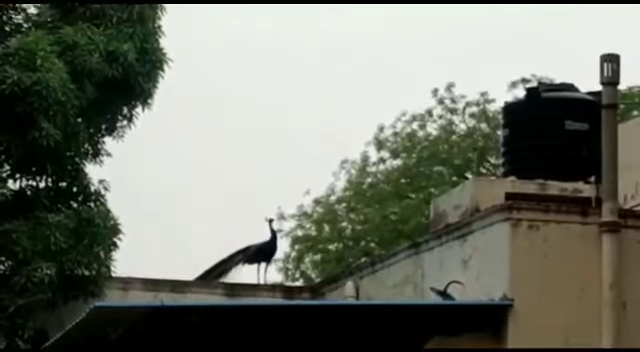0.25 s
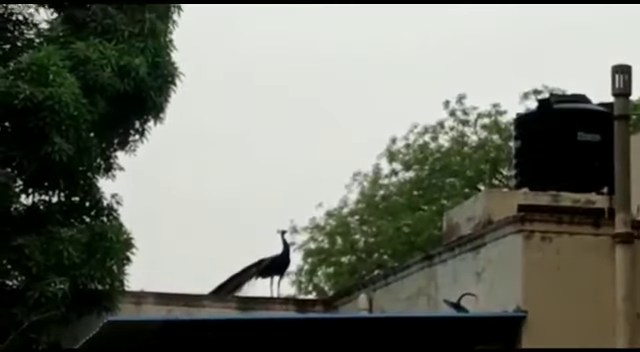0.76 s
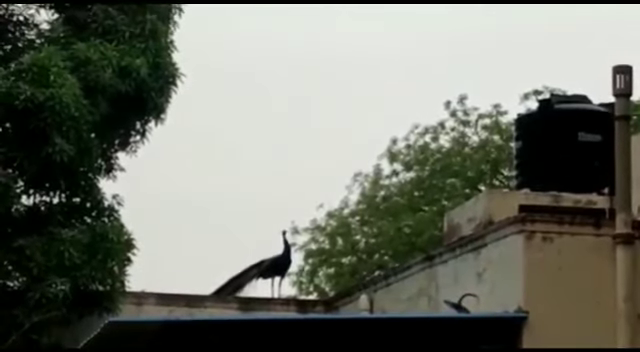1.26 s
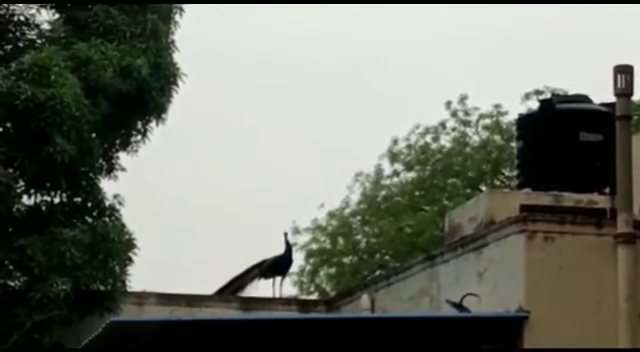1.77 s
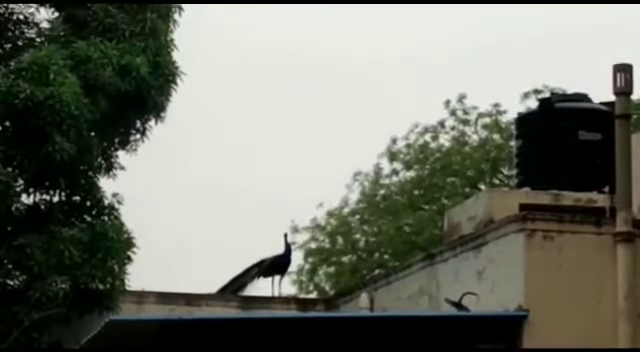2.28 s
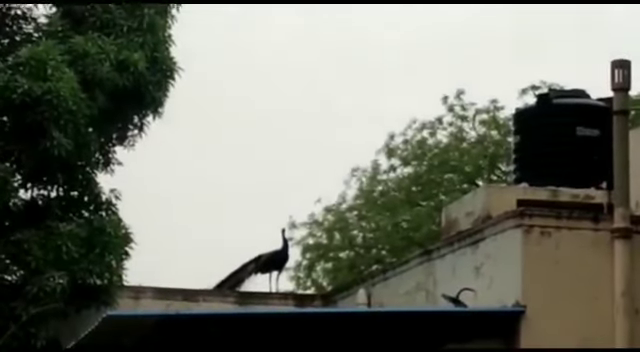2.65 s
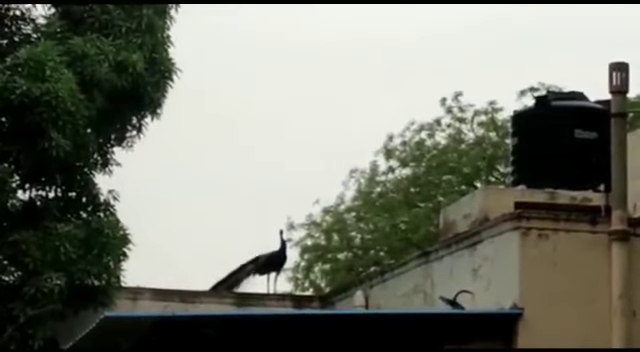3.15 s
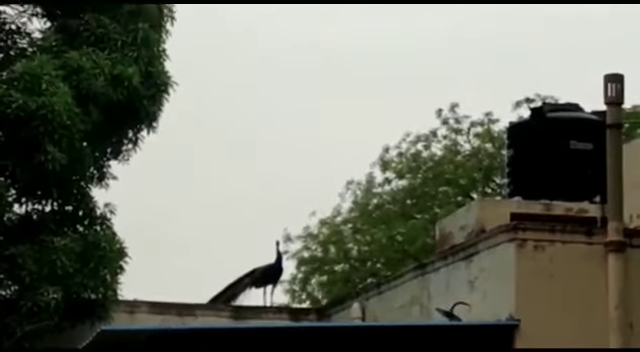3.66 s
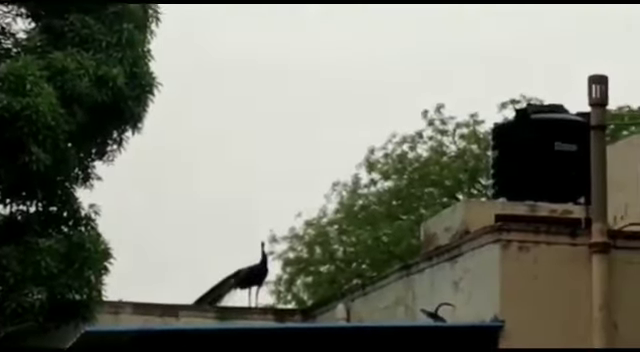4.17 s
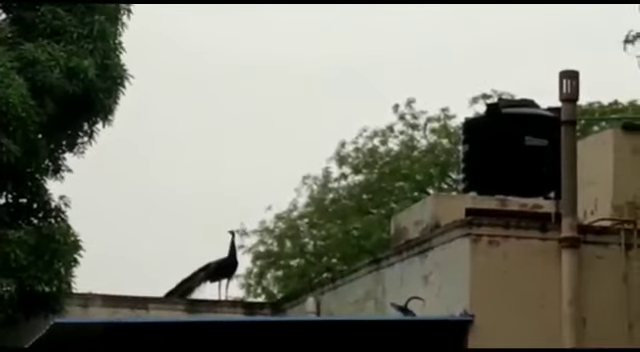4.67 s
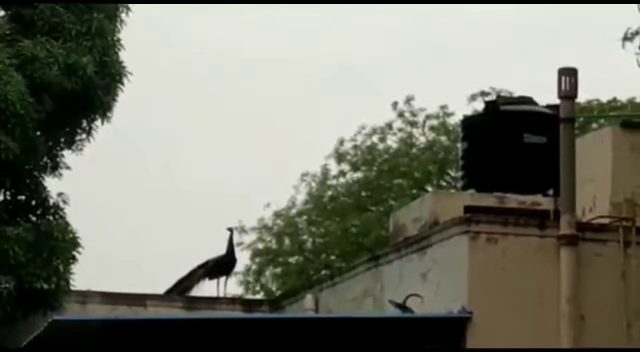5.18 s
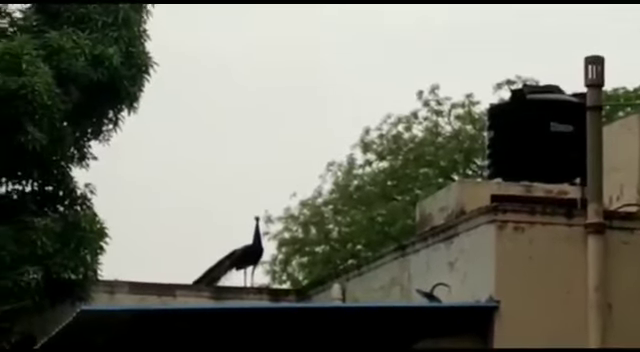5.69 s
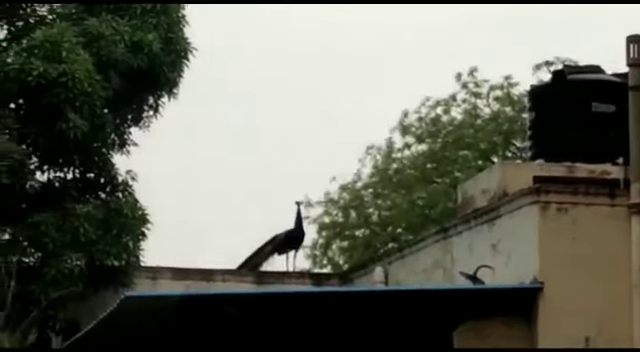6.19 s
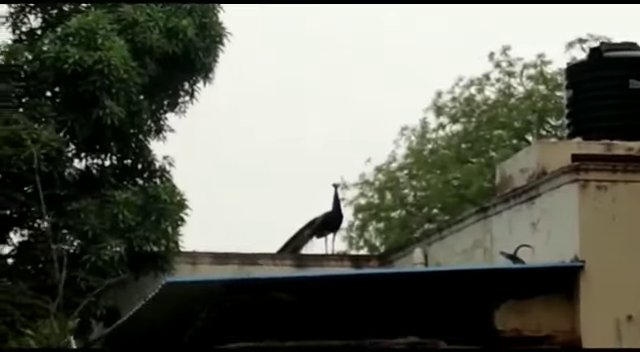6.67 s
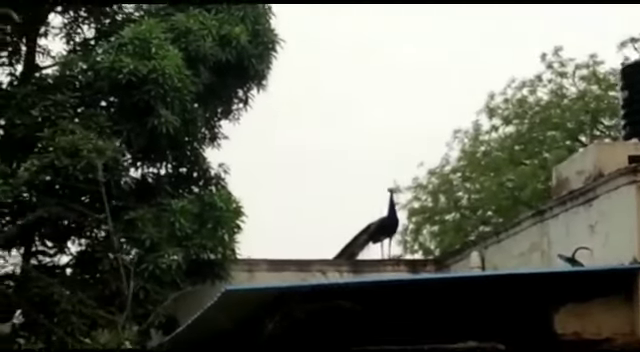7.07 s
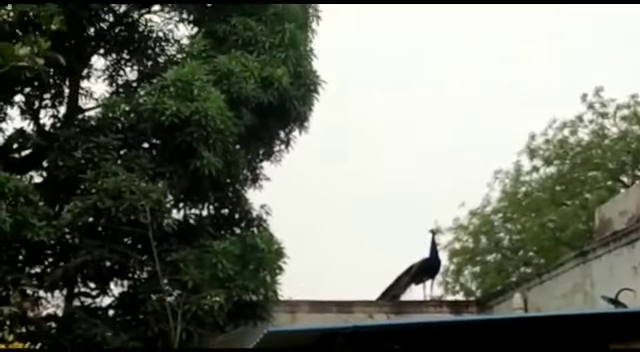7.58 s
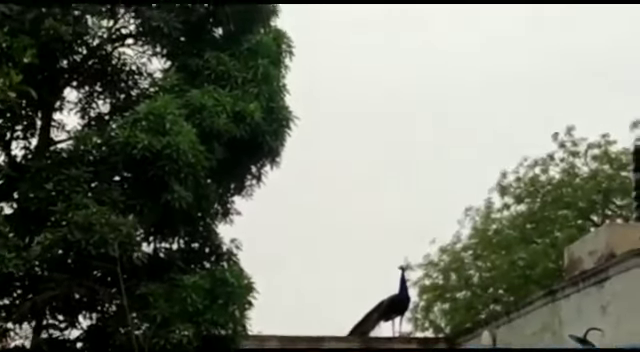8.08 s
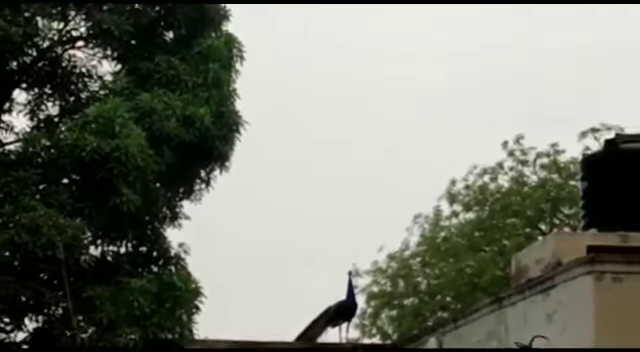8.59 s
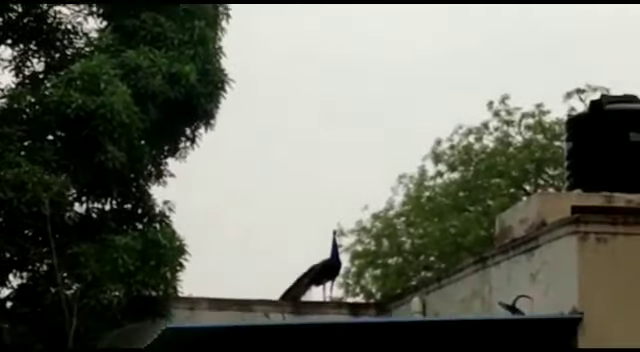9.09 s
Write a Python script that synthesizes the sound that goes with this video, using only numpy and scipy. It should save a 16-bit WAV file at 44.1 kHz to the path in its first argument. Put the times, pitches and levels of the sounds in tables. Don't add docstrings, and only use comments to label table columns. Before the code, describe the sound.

Outdoors, echoing peacock screams and harsh parakeet squawks fill the first three seconds, then fade into sparse songbird whistles, coos and faint hum.

```python
import sys
import numpy as np
from scipy import signal
from scipy.fft import rfft, irfft
from scipy.io import wavfile
from scipy.ndimage import uniform_filter1d, minimum_filter1d, map_coordinates

SR = 44100
rng = np.random.default_rng(int(sys.argv[2]) if len(sys.argv) > 2 else 0)


def attenuation_scalar(level_db):
    decades = np.asarray(level_db, float) / 20
    return 10 ** decades


def bounce(signal):
    frames = np.transpose(np.atleast_2d(signal))
    limited = np.clip(frames, -1, 1)
    pcm = np.round(limited * 32767).astype(np.int16)
    wavfile.write(sys.argv[1], SR, pcm)


N = 411894

# time in seconds, level in dB.
FLOCK_LEVEL = [(0.0, -28), (.31, -30), (.7, -36.5), (.8, -36), (.85, -30), (.96, -23.5), (1.02, -44),
               (1.14, -44), (1.2, -29), (1.48, -43), (1.71, -35), (2.109, -33), (2.341, -33), (2.52, -42),
               (2.66, -31), (2.78, -28.5), (3.01, -50.5), (3.22, -47), (3.742, -47.5), (4.8, -47.5),
               (5.2, -53.5), (6.3, -45.5), (9.34, -61.5)]


def at_hz(points, hz):
    points_hz, values = np.transpose(points)
    return np.interp(np.log(hz), np.log(points_hz), values)


def drift(rate_hz, size=N):
    points = rng.standard_normal(int(size / SR * 400) + 2)
    return 1.22 * np.interp(np.arange(size) * rate_hz / SR, np.arange(len(points)), points)


def filtered(x, order, cut_hz, kind="low"):
    return signal.sosfilt(signal.butter(order, cut_hz, kind, fs=SR, output="sos"), x)


def resonances_db(rows, hz):
    return sum(db / (1 + (2 * (hz - centre_hz) / width_hz) ** 2) for centre_hz, width_hz, db in rows)


def add(out, start_s, sound, pan_db):
    i = int(start_s * SR)
    soft_ends = signal.windows.tukey(len(sound), min(1, 200 / len(sound)))
    sound = (sound * soft_ends)[:N - i]
    out[:, i:i + len(sound)] += sound * attenuation_scalar([[pan_db / 2], [-pan_db / 2]])


def coloured(spectrum, patchy_db):
    # frequency in Hz, left-right likeness 0-1.
    likeness = [(60, 0.46), (180, 0.78), (550, 0.36), (1650, 0.0075), (4970, 0.12), (15000, 1)]
    hz = np.fft.rfftfreq(N, 1 / SR) + 1
    mid, side = rfft(rng.standard_normal((2, N)))
    alike = np.clip(at_hz(likeness, hz), 0, 1)
    pair = np.sqrt(1 + alike) * mid + np.sqrt(1 - alike) * side * [[1], [-1]]
    noise = irfft(pair * attenuation_scalar(at_hz(spectrum, hz)), N)
    _, _, cells = signal.stft(noise, nperseg=512)
    band = (10 * np.log2(np.arange(len(cells[0])) + 1)).astype(int)
    flicker = uniform_filter1d(rng.standard_normal((band.max() + 1, cells.shape[2])), size=6) * 2.4
    flicker = .88 * flicker + .48 * uniform_filter1d(flicker, size=9, axis=0) * 3
    dropout_db = 28 * np.clip(-1.5 - flicker[band], 0, 1)
    cells = cells * attenuation_scalar(patchy_db * flicker[band] - dropout_db)
    noise = signal.istft(cells, nperseg=512)[1][:, :N]
    return noise / np.sqrt(np.mean(noise ** 2))


def background(smear):
    # frequency in Hz, level in dB per Hz.
    town_spectrum = [(18, -79), (30, -45), (124, -20.5), (198, -4), (301, -10), (551, -8), (931, -11.5),
                     (1790, -10), (2460, 2), (3110, -12.5), (3830, -7), (5800, -14.5), (6480, -14.5),
                     (11200, -24.5), (15800, -25)]
    high_spectrum = [(1200, -87), (2600, -12.5), (3200, 3), (4500, 1.5), (6500, -3.5), (8800, -8.5),
                     (10000, -15), (15500, -32)]
    low_spectrum = [(250, -56), (500, -18), (700, -9.5), (1000, -22.5), (1500, -3.5), (2000, -0.5),
                    (2500, 1), (3000, -7.5), (3600, -27), (6000, -64)]
    # time in seconds, level in dB.
    chatter_level = [(0.0, -27), (.3, -35), (.75, -30.5), (1.9, -32.5), (3.0, -38), (3.9, -53.5),
                     (4.45, -43), (4.9, -51), (5.85, -43), (7.9, -45), (9.34, -49.5)]
    # centre in Hz, width in Hz, gain in dB.
    ports = [(2555, 126, 4), (3800, 49, 8), (5135, 310, 7.5), (6434, 91, 12), (7460, 1100, 3)]
    # frequency in Hz, left-right difference in dB.
    lean = [(60, 0), (130, 0), (290, 0.5), (640, 1), (1410, -1), (3100, -7.5), (6820, -7.5), (15000, 11)]
    t = np.arange(N) / SR
    low = attenuation_scalar(np.interp(t, *np.transpose(chatter_level)))
    high = attenuation_scalar(np.interp(t, *np.transpose(FLOCK_LEVEL)))
    wash = (low + smear) * coloured(low_spectrum, patchy_db=3.8)
    wash += high * coloured(high_spectrum, patchy_db=4.0)
    wash += attenuation_scalar(-47) * coloured(town_spectrum, patchy_db=3.0)
    hz = np.fft.rfftfreq(N, 1 / SR)
    pan_db = at_hz(lean, hz + 1) * [[.5], [-.5]]
    return irfft(rfft(wash) * attenuation_scalar(resonances_db(ports, hz) - 5.0 + pan_db), N)


def hum():
    pitch_hz = 206.4 + 6.37 * drift(25)
    level_db = -69 + 2.55 * drift(18)
    return np.sqrt(2) * attenuation_scalar(level_db) * np.sin(2 * np.pi * np.cumsum(pitch_hz) / SR)


def wind():
    # centre in seconds, level in dB.
    gusts = [
        (.85, -59.5),
        (2.25, -62.5),
        (6.88, -66.5),
    ]
    half_length_s = 0.35
    t = np.arange(N) / SR
    swell = sum(attenuation_scalar(db) * np.exp(-((t - s) / half_length_s) ** 2) for s, db in gusts)
    swell = swell * attenuation_scalar(3.5 * drift(18))
    puff = filtered(rng.standard_normal((2, N)) + rng.standard_normal(N), 2, [190, 430], "band")
    return swell * puff / puff.std()


def insect():
    # start in seconds, level in dB, T60 in seconds.
    sizzles = [
        (7.601, -50.5, 0.53),
        (7.7, -48, 0.38),
    ]
    out, t = np.zeros((2, N)), np.arange(SR // 2) / SR
    for start_s, db, t60_s in sizzles:
        buzz = filtered(rng.standard_normal(len(t)), 2, [9300, 10600], "band")
        add(out, start_s, 3.0 * attenuation_scalar(db - 60 * t / t60_s) * buzz, pan_db=-3.0)
    return out


def whistle(table, bow, waver_db, wobble, pan_db, order=4):
    out = np.zeros((2, N))
    for start_s, length_s, first_hz, last_hz, db in table:
        u = np.linspace(-1, 1, int(length_s * SR))
        pitch_hz = (first_hz + last_hz) / 2 * (1 + bow * (1 - u ** 2)) + (last_hz - first_hz) / 2 * u
        pitch_hz *= 1 + wobble * drift(83.4, len(u))
        swell = attenuation_scalar(db + 2 + waver_db * drift(130, len(u))) * (1 - u ** order)
        add(out, start_s, swell * np.sin(2 * np.pi * np.cumsum(pitch_hz) / SR), pan_db)
    return out


def doves():
    # delay or start in seconds, length in seconds, first Hz, last Hz, level in dB.
    phrase = [
        (0.0, 0.086, 508, 502.5, -58),
        (0.086, 0.186, 648, 586, -66),
        (0.347, 0.096, 488.5, 519.5, -62),
        (.42, .33, 625, 500, -62.5),
        (1.067, .26, 614, 450, -62),
    ]
    far_notes = [
        (.001, 0.11, 707, 628, -47),
        (4.99, 0.15, 540, 543, -63),
        (5.28, 0.46, 543.6, 538, -57.5),
        (5.9, 0.21, 541, 520, -60.5),
        (8.12, 0.27, 753, 775, -61),
        (8.45, 0.24, 520, 503, -70),
    ]
    starts_s = [3.2, 4.91, 6.6, 8.32]
    coos = [(s + delay_s, *rest) for s in starts_s for delay_s, *rest in phrase if s + delay_s < N / SR]
    return whistle(coos + far_notes, bow=0.0572, waver_db=3.0, wobble=0.0033, pan_db=-1.0)


def songbirds():
    # start in seconds, length in seconds, first Hz, last Hz, level
    # in dB.
    straight = [(.001, 0.078, 2160, 1915, -40), (.075, 0.068, 3340, 2920, -32.5),
                (4.42, 0.061, 3800, 3600, -45.5), (4.75, 0.11, 4530, 3700, -43), (4.84, 0.02, 3850, 2970, -54),
                (6.0, 0.13, 4720, 3620, -44), (6.105, 0.022, 3770, 2790, -47), (6.37, 0.018, 3620, 2860, -43),
                (6.25, 0.067, 4680, 3590, -48), (6.795, 0.022, 4300, 2890, -44),
                (7.27, .04, 4780, 4010, -45.5), (7.92, 0.033, 4000, 3700, -50.5),
                (7.96, 0.031, 3390, 3160, -43.5), (8.38, 0.085, 4675, 3570, -46),
                (9.115, 0.087, 5280, 3740, -45),
                (0.721, 0.26, 2380, 2324, -34), (3.03, 0.067, 2822, 3130, -47),
              (3.27, 0.15, 6080, 6350, -47.5), (4.48, 0.083, 4225, 4230, -44),
              (5.099, 0.2, 1373, 1343, -55.5), (5.55, 0.052, 3800, 3970, -53),
              (5.709, 0.087, 3910, 4050, -48.5), (7.639, 0.09, 2393, 2484, -43),
              (8.02, 0.031, 3050, 3220, -46.5), (8.131, 0.22, 1600, 1594, -57.5),
              (8.74, 0.12, 1810, 1967, -53), (8.929, 0.28, 4130, 4130, -56),
                (3.851, .121, 4210, 4790, -54), (5.761, .041, 2740, 2010, -54), (6.221, .11, 2450, 1760, -55),
             (6.621, .031, 2710, 3290, -55), (6.821, .131, 2610, 2410, -52), (6.961, .051, 3755, 3785, -54),
             (7.121, .081, 2755, 2785, -54), (7.251, .061, 2490, 1960, -54), (7.301, .061, 3890, 2810, -61),
             (7.501, .081, 2290, 2110, -55), (7.841, .041, 2485, 2475, -51), (7.921, .051, 2455, 2545, -51),
             (7.771, .061, 2155, 2245, -53), (8.161, .051, 2505, 2485, -53), (8.031, .031, 4290, 4010, -56),
             (.361, .051, 4190, 3810, -43), (3.481, .061, 5620, 5210, -44), (3.551, .036, 5210, 4410, -46),
             (3.491, .071, 6900, 6100, -49), (.441, .031, 3390, 3110, -39), (.481, .028, 4290, 3010, -37),
             (.641, .051, 3890, 2910, -43), (.601, .041, 2945, 2755, -41)]
    humps = [(3.665, 0.094, 6380, 6740, -48), (5.27, 0.13, 1360, 1502, -46.5),
             (6.32, 0.054, 3555, 3550, -39.5), (6.4, 0.056, 2457, 2590, -43.5),
             (6.75, 0.1, 4220, 4310, -48), (7.07, 0.034, 2394, 2600, -47), (7.6, 0.074, 3880, 3430, -53),
             (8.48, 0.19, 4050, 3910, -54.5), (9.28, 0.063, 3890, 3650, -52.5)]
    scoops = [(.33, 0.062, 3066, 2795, -34), (3.89, 0.13, 6290, 4210, -46.5),
              (3.96, 0.045, 5000, 4620, -45.5), (4.0, 0.033, 4300, 4200, -45),
              (4.58, 0.11, 4600, 3450, -52), (5.41, 0.11, 1506, 1022, -49.5),
              (8.83, .12, 3950, 3535, -49.5), (8.89, 0.16, 3910, 5440, -54.5), (9.19, 0.1, 2930, 3930, -44)]
    chips = [
        (7.111, .015, 2640, 2760, -41),
        (7.413, .046, 2610, 2670, -44),
        (8.475, .038, 4100, 3020, -42),
        (8.864, .017, 3710, 3630, -47),
        (7.684, .031, 2485, 2505, -47),
    ]
    kinds = [(straight, 0), (humps, .04), (scoops, -0.031)]
    whistles = sum(whistle(table, bow, waver_db=3.2, wobble=0.015, pan_db=-6.0) for table, bow in kinds)
    return whistles + whistle(chips, 0, waver_db=2.5, wobble=.008, pan_db=-6.5, order=30)


def voice(pitch_hz, partial_db, hoarse, memory, waver_db):
    turn = 2 * np.pi * np.cumsum(pitch_hz) / SR
    out = np.zeros(len(turn))
    for k, db in enumerate(partial_db, 1):
        waver = waver_db * min(k, 6) ** .5 * drift(28, len(turn))
        gain = attenuation_scalar(db + waver) * (k * pitch_hz < .37 * SR)
        white = rng.standard_normal((2, len(turn)))
        rasp = signal.lfilter([2 * (1 - memory) ** 1.5], [1, -2 * memory, memory ** 2], white)
        phase = k * turn + 2 * np.pi * rng.random()
        spread = rasp[0] * np.sin(phase) + rasp[1] * np.cos(phase)
        out += gain * (np.sin(phase) + hoarse * min(k * k / 9, 4) * spread)
    return np.sqrt(2) * out


def parakeets():
    # time in seconds, pitch in Hz, level in dB.
    plain_shape = [(0, 1100, -14), (.014, 1800, -4), (.028, 2235, 0.1), (.045, 2200, 0), (.07, 1750, -2),
                   (.1, 1520, -2), (.122, 1380, -4), (.135, 1130, -14)]
    held_shape = [(0, 1490, -16), (.02, 1910, -9.5), (.04, 2300, -1), (.06, 2198, -3.5), (.075, 2185, -7),
                  (.095, 1993, 0), (.11, 1823, -7), (.125, 1490, -19), (.14, 1280, -14)]
    # start in seconds, level in dB, pitch factor, stretch, rasp 0-1.2.
    squawks = [
        (0.581, -42, 1.38, 1.27, 0.6),
        (1.181, -36, 1.04, 0.85, 0.97),
        (1.45, -34.5, 1.024, 0.91, 0.27),
        (1.728, -37, 0.99, 0.85, 0.4),
        (1.998, -39.5, 0.94, 0.97, 0.4),
        (2.419, -42.5, 0.96, 1.18, 0.2),
        (3.139, -42.5, 1.004, 0.95, 0.43),
        (3.422, -42, 0.96, 0.94, 0.52),
        (4.054, -47.5, 1.08, 0.91, 0.4),
        (7.235, -56, 0.96, 1.2, 0.8),
    ]
    held_squawks = [
        (.13, -31.5, 0.98, 1.01, 0.89),
        (.415, -31.5, 1.0, .87, 1.0),
    ]
    # frequency in Hz, gain in dB.
    beak = [(1000, -4), (2200, 5), (4300, 2.5), (6500, -7.5), (8800, -7), (10000, -28), (15500, -35)]
    out = np.zeros((2, N))
    flock_s, flock_db = np.transpose(FLOCK_LEVEL)
    flock = [(9 * a, np.interp(9 * a + .07, flock_s, flock_db) - 14.0, .85 + .5 * b, .6 + .6 * c, 1.1)
             for a, b, c in rng.random((45, 3))]
    calls = [(plain_shape, row) for row in squawks + flock] + [(held_shape, row) for row in held_squawks]
    for shape, (start_s, level_db, factor, stretch, rasp) in calls:
        s, hz, db = np.transpose(shape)
        t = np.arange(0, s[-1] * stretch, 1 / SR) / stretch
        pitch_hz = uniform_filter1d(factor * np.interp(t, s, hz), size=400)
        pitch_hz = pitch_hz * (1 + .012 * drift(150, len(t)))
        dull_db = .55 * min(level_db + 36, 0)
        partials_db = [at_hz(beak, k * pitch_hz) + dull_db * np.log2(k) + 2.5 * drift(160, len(t))
                       for k in range(1, 10)]
        harsh = voice(pitch_hz, partials_db, hoarse=.8 * rasp, memory=.86, waver_db=1.5)
        add(out, start_s, attenuation_scalar(level_db - 3.0 + np.interp(t, s, db)) * harsh, pan_db=-8.0)
    return filtered(out, 4, 1250, "high")


def peafowl():
    # time in seconds, pitch in Hz, effort in dB, beak opening in dB, hoarseness in dB.
    far_scream = [(.25, 669, -57, -26, -23), (0.349, 706, -43, -18, -6), (0.441, 749, -37, 3, -10.5),
                  (0.519, 745, -36, -2.5, -29), (0.601, 712, -41, -17, -20), (0.699, 671, -46, -10, -4.5)]
    high_scream = [(.72, 800, -27.5, -14, -17), (.77, 868, -33, -13, -6.5), (.82, 909.5, -53, -12, -6.5),
                   (0.879, 915, -24, -13.5, -15.5), (0.949, 897, -17.5, -19.5, -10.5),
                   (1.019, 873, -16, -13, -21.5), (1.099, 856.4, -26.5, -1, -20),
                   (1.171, 814.5, -20.5, -10, -13.5), (1.359, 734.4, -43, -9, -9)]
    hidden_scream = [(.78, 723.7, -48, -8, -8), (.87, 724, -44, -3, -2.5), (0.949, 716.4, -37, -14, -19),
                     (1.059, 747.4, -31, -18, -33), (1.16, 741, -33.5, -23, -32),
                     (1.299, 725, -38, -37, -3.5)]
    soft_scream = [(1.57, 653, -47, -26, -15), (1.649, 699, -47.5, -15, -21.5),
                   (1.719, 733, -33.5, -5, -25), (1.79, 747, -30.5, -7.5, -36),
                   (1.852, 741.5, -25.5, -9, -44), (1.92, 726, -38, -9, -29.5), (2.0, 688.5, -39, -13, -13),
                   (2.071, 629, -39, -17, -14)]
    near_scream = [(2.08, 550, -49.5, -19, -14.5), (2.13, 585.4, -21.5, -23.5, -20),
                   (2.201, 638.6, -19, -14, -25), (2.276, 668.4, -20, -14.5, -30),
                   (2.369, 681.3, -20.5, -7, -49), (2.48, 682, -20.5, -5.5, -55),
                   (2.59, 658.7, -17.5, -16.5, -29), (2.69, 596.7, -17.5, -18.5, -26),
                   (2.789, 542, -31.5, -19, -17.5)]
    # first partial in dB, second over first in dB, left-right dB, shading under 9 kHz in dB.
    callers = [
        (-46.5, 6, -2, -0.5),
        (-37, 7, -0.5, -2),
        (-46.5, 3.5, -3.5, 1.5),
        (-44, 3, -5, -3.5),
        (-39.5, 12.5, 0, 0.5),
    ]
    # frequency in Hz, gain in dB.
    windpipe = [(1600, 2.5), (1940, -4), (2050, 4), (2250, 2.5), (2400, -5.5), (2570, 0.5), (2720, -15),
                (3600, -23)]
    throat = [(2500, 12.5), (3400, -7.5), (4100, -4), (4800, -7), (5500, -9.5), (6150, -7.5), (7500, -12),
              (9000, -21), (10500, -23), (12500, -20.5), (14400, -29), (15800, -26.5)]
    # frequency in Hz, left-right dB; then frequency in Hz, left lead in radians.
    scatter = [(500, -1), (1300, 7.5), (2400, -5), (4400, -3), (8000, -3), (14000, 21)]
    scatter_phase = [(500, 0.69), (860, 1.7), (1290, 1.96), (1890, 2.06), (2330, -2.74), (2930, 0.98),
                     (4100, 2.26), (8000, -0.13)]
    out = np.zeros((2, N))
    screams = [far_scream, high_scream, hidden_scream, soft_scream, near_scream]
    for rows, (first_db, second_db, pan_db, shade_db) in zip(screams, callers):
        s, hz, *columns = np.transpose(rows)
        t = np.arange(s[0], s[-1], 1 / SR)
        effort_db, opening_db, hoarse_db = [np.interp(t, s, c) for c in columns]
        place = np.interp(t, s, np.arange(len(s)))
        pitch_hz = map_coordinates(hz, [place], order=3, mode="nearest")
        pitch_hz = uniform_filter1d(pitch_hz, size=1800, mode="nearest")
        pitch_hz *= 1 + .04 * attenuation_scalar(hoarse_db) * drift(60, len(t))
        lowest_db = first_db + 0.29 * (effort_db - effort_db.max())
        partials_db = [lowest_db, lowest_db + second_db]
        partials_db += [effort_db + at_hz(windpipe, k * pitch_hz) for k in (3, 4)]
        for k in range(5, 29):
            shading_db = shade_db / (1 + (k * pitch_hz / 9000) ** 8)
            partials_db.append(effort_db + opening_db + at_hz(throat, k * pitch_hz) + shading_db)
        scream = voice(pitch_hz, partials_db, attenuation_scalar(hoarse_db), memory=.93, waver_db=1.3)
        add(out, t[0], scream, pan_db)
    hz = np.fft.rfftfreq(N, 1 / SR) + 1
    halves = np.array([[.5], [-.5]])
    stereo = attenuation_scalar(at_hz(scatter, hz) * halves) * np.exp(1j * at_hz(scatter_phase, hz) * halves)
    return irfft(rfft(out) * stereo / (1 + (400 / hz) ** 8), N)


def slaps(x):
    # delay in seconds, level in dB.
    walls = [
        (.075, -15),
        (.135, -14),
    ]
    dull = filtered(x[::-1], 2, 3500)
    return sum(attenuation_scalar(db) * np.roll(dull, int(delay_s * SR), axis=1) for delay_s, db in walls)


def yard(x):
    late_t60_s, early_db, early_t60_s = 1.12, 3.5, 0.079
    t = np.arange(2 * SR) / SR
    decay = attenuation_scalar(-60 * t / late_t60_s) + attenuation_scalar(early_db - 60 * t / early_t60_s)
    tail = rng.standard_normal((2, len(t))) * decay * np.clip(t / 0.004, 0, 1)
    tail = filtered(tail, 1, 8000)
    tail /= np.sqrt(np.sum(tail ** 2, axis=1, keepdims=True))
    return attenuation_scalar(-6.5) * signal.fftconvolve(x, tail, axes=1)[:, :N]


def scene():
    smear_db, smear_t60_s, hush_db = -8, 0.41, -21.5
    screams, coos = peafowl(), doves()
    others = parakeets() + songbirds() + insect()
    power = uniform_filter1d(np.mean(screams ** 2, axis=0), size=4000).clip(0)
    fade = attenuation_scalar(-120 / (smear_t60_s * SR))
    smear = attenuation_scalar(smear_db) * np.sqrt(signal.lfilter([1 - fade], [1, -fade], power))
    hush = 1 / (1 + np.sqrt(power) / attenuation_scalar(hush_db))
    echoes = yard(attenuation_scalar(-3.5) * screams + attenuation_scalar(-3) * coos + attenuation_scalar(2.5) * others)
    birds = screams + slaps(screams) + coos + others + echoes
    return birds + hush * background(smear) + hum() + wind()


def suppress(x, depth_db, reach):
    mask_db = -42.5
    _, _, cells = signal.stft(x, nperseg=1024)
    power = uniform_filter1d(np.mean(np.abs(cells) ** 2, axis=0), size=3, axis=0)
    power = uniform_filter1d(power, size=3, axis=1)
    loudest = -minimum_filter1d(-power, size=reach, axis=0)
    below = loudest * attenuation_scalar(2 * depth_db) + power.max(axis=0) * attenuation_scalar(2 * mask_db)
    keep = 1 / (1 + (below / (power + 1e-20)) ** 3)
    keep[:8] = 1
    return signal.istft(cells * keep, nperseg=1024)[1][:, :N]


def top_cut(x):
    return signal.sosfilt(signal.butter(12, 15840, fs=SR, output="sos"), x)


def record(dry):
    # centre in Hz, width in Hz, gain in dB.
    ground_dips = [(800, 100, -6), (1690, 800, -9), (1097, 56, -2), (9800, 480, -2.5)]
    hz = np.fft.rfftfreq(N, 1 / SR)
    dipped = irfft(rfft(dry) * attenuation_scalar(resonances_db(ground_dips, hz)), N)
    thin = filtered(dipped, 2, 70, "high")
    clean = suppress(thin, depth_db=-19, reach=15)
    return top_cut(clean)


dry = scene()
out = record(dry)
bounce(out)
```